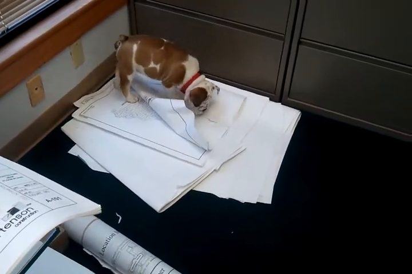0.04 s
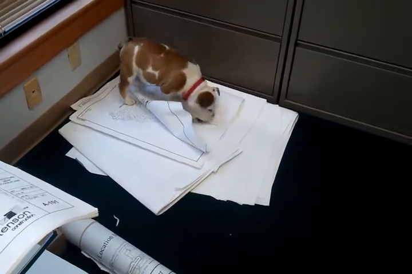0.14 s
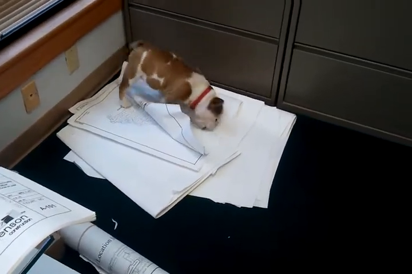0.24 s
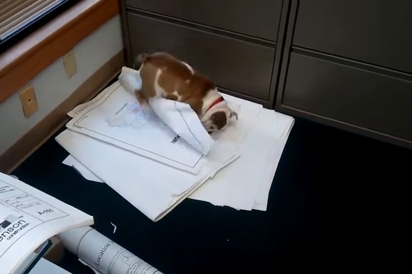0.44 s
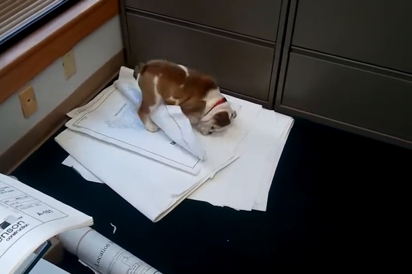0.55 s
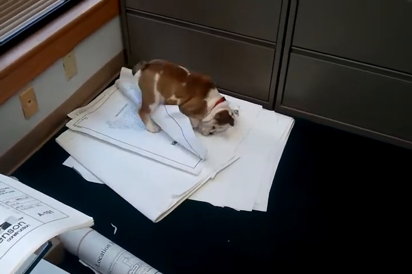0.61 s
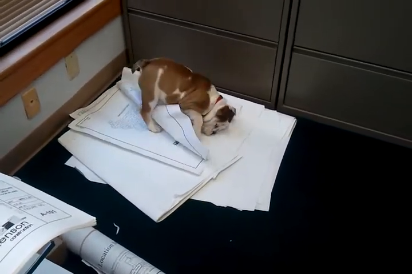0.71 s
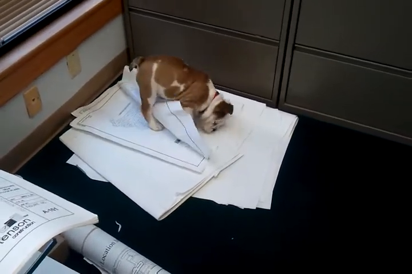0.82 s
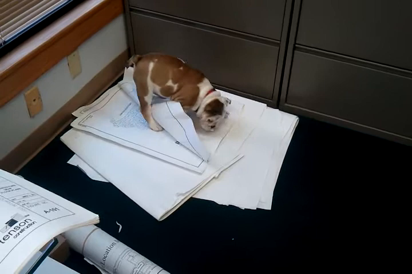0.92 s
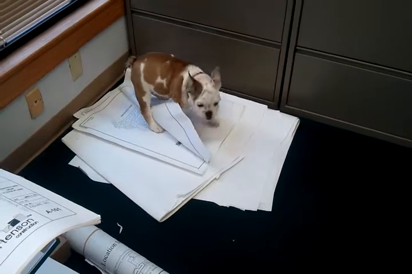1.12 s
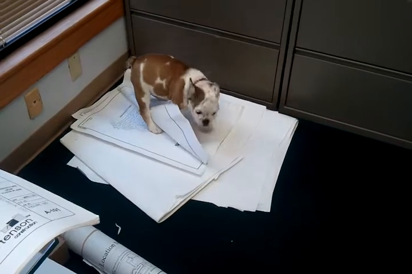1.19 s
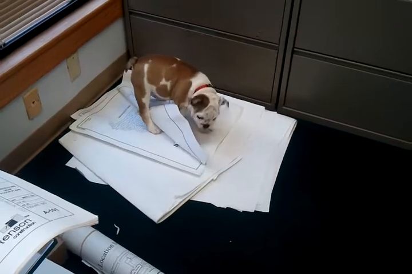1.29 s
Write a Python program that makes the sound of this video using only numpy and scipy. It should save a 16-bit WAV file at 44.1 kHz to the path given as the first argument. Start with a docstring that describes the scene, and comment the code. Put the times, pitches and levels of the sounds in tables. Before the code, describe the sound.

Paper crumples in quick bursts with crisp snaps, then slides with a thin rasp and a few fainter crackles. A puppy's soft steps thud beneath the sheets, and the close walls of a quiet office add a short ring.

```python
"""Puppy on paper sheets

A puppy paws and noses large paper sheets on the carpet of a small office. The sheets slide
over each other with a fine hiss, crumple in short swells and snap where a crease gives way.
Soft paw steps thud underneath; close walls and cabinets add a short ring."""
import sys
import numpy as np
from scipy import signal
from scipy.fft import rfft, irfft, next_fast_len
from scipy.io import wavfile

SR = 44100
rng = np.random.default_rng(int(sys.argv[2]) if len(sys.argv) > 2 else 0)


def put_to_file(sound):
    """Save the sound as 16-bit audio at rate SR, in the file named by the first command-line argument."""
    columns = np.atleast_2d(sound).T  # one column per channel
    safe = np.clip(columns, -1, 1)
    whole_steps = np.round(safe * 32767)
    wavfile.write(sys.argv[1], SR, whole_steps.astype(np.int16))


N = 59535
T = np.arange(N) / SR
CUTOFF_HZ = 8500
FIBRE_TICKS_PER_S, FIBRE_SPREAD_DB = 11000, 3.5


def from_db(db):
    """Decibels to gain."""
    return 10 ** (np.asarray(db) / 20)


def rms_one(x):
    """Scale to unit rms."""
    return x / np.sqrt(np.mean(x ** 2) + 1e-20)


def at_hz(points, hz):
    """Read a table on a log-frequency axis."""
    freqs, values = np.transpose(points)
    return np.interp(np.log(np.maximum(hz, 1)), np.log(freqs), values)


def coloured(x, spectrum):
    """Minimum-phase EQ with a steep top roll-off; keeps the power of white input."""
    size = next_fast_len(2 * N)
    hz = np.arange(size // 2 + 1) * SR / size
    gain = rms_one(from_db(at_hz(spectrum, hz)) / (1 + (hz / (CUTOFF_HZ + 1000)) ** 12))
    # folding the cepstrum keeps the filter from ringing ahead of a click
    cepstrum = irfft(np.log(gain), size)
    cepstrum[1:size // 2] *= 2
    cepstrum[size // 2 + 1:] = 0
    return irfft(rfft(x, size) * np.exp(rfft(cepstrum)), size)[:N]


def resonance(x, hz, q):
    """Band-pass around one pitch, narrower as q rises."""
    edge_ratio = 1 + .5 / max(q, .5)
    band_hz = [hz / edge_ratio, min(hz * edge_ratio, SR / 2 - 1000)]
    return signal.sosfilt(signal.butter(2, band_hz, "band", fs=SR, output="sos"), x + 1e-18)


def grains(per_s, spread_db):
    """Random clicks of uneven size, at unit rms."""
    sizes = from_db(spread_db * np.minimum(rng.exponential(1, N), 4))
    signs = rng.choice([-1, 1], N)
    return rms_one(sizes * signs * (rng.random(N) < per_s / SR))


def swell(peak_s, rise_s, decay_s):
    """Exponential rise to 1 at the peak, then exponential decay."""
    return np.exp(np.maximum(np.minimum((T - peak_s) / rise_s, (peak_s - T) / decay_s), -30))


def burst(start_s, decay_s):
    """Instant attack, then exponential decay."""
    return (T > start_s) * swell(start_s, 1, decay_s)


def shaped(x, envelope):
    """Put x under an envelope, with the energy of that envelope."""
    y = x * envelope
    return y * np.sqrt(np.sum(envelope ** 2) / (np.sum(y ** 2) + 1e-20))


def air():
    """Room tone: the still air of the office, a faint, dark, steady noise."""
    # tone of the air: freq_hz, gain_db
    colour = [(12, -16), (35, 4), (60, -3.5), (90, -4), (150, -4.5), (235, 5), (320, -2), (600, -2.5),
              (1200, -8.5), (3000, -10), (8000, -11)]
    return from_db(-55.5) * rms_one(coloured(rng.standard_normal(N), colour))


def slide():
    """Fibres catch and slip in thousands of tiny ticks that blur into a hiss as the sheets move."""
    # level ride of paper sliding on paper: time_s, level_db
    ride = [(0, -60.5), (.09, -53.5), (.135, -50), (.18, -70), (.222, -53.5), (.29, -37.5), (.325, -32.5),
            (.41, -47.5), (.47, -44), (.505, -44), (.522, -31.5), (.537, -40.5), (.58, -41), (.71, -50.5),
            (.76, -50), (.805, -41), (.84, -45), (.925, -41), (1.03, -43), (1.09, -58), (1.15, -48.5),
            (1.175, -50.5), (1.215, -45), (1.24, -52.5), (1.3, -54.5), (1.35, -53.5)]
    # tone of the hiss: freq_hz, gain_db
    colour = [(30, -48.5), (100, -20.5), (250, -7.5), (700, -7), (1300, -6.5), (2600, -10), (3500, -5.5),
              (4400, -1.5), (6500, 1.5), (7700, 1), (9000, -11.5)]
    level_db = np.interp(T, *np.transpose(ride))
    ticks = grains(FIBRE_TICKS_PER_S, FIBRE_SPREAD_DB)
    return from_db(level_db) * rms_one(coloured(ticks, colour))


def crumples():
    """A swell of small buckles crackles and shakes the bending panel of paper."""
    # a sheet crumples: peak_s, rise_s, decay_s, crackle_db, panel_hz, panel_db
    swells = [(0.139, 0.018, .016, -51, 680, -57), (0.15, 0.0079, 0.0094, -63, 3700, -39.5),
              (0.246, 0.0039, 0.021, -33, 1050, -36), (0.251, 0.0036, 0.025, -41.5, 2500, -36),
              (0.309, 0.0086, 0.02, -43.5, 850, -40.5), (0.33, 0.035, 0.024, -39, 3200, -35),
              (0.353, 0.0093, 0.025, -33, 777, -36), (0.361, 0.011, 0.024, -28, 1194, -37),
              (0.497, 0.0043, 0.014, -32, 780, -37.5), (0.573, 0.015, 0.032, -40.5, 805, -45.5),
              (0.618, 0.0076, 0.016, -50, 600, -36.5), (0.63, 0.0051, 0.019, -29, 1500, -38.5),
              (.657, 0.003, 0.022, -42.5, 2200, -44), (0.781, .004, .01, -71, 1000, -52.5),
              (0.937, 0.003, 0.029, -25.5, 830, -51), (0.957, 0.0034, 0.032, -37, 510, -43.5),
              (1.049, 0.0034, 0.011, -73, 2880, -44.5), (1.169, 0.0057, 0.01, -47, 1100, -54),
              (1.271, 0.0072, 0.006, -49, 1610, -54), (1.313, 0.0015, 0.016, -42, 1170, -74),
              (1.328, 0.0065, 0.0083, -49, 1100, -42.5)]
    # tone of the crackle: freq_hz, gain_db
    colour = [(40, -26.5), (110, -27.5), (220, -1), (450, -5), (800, -1.5), (1400, -4.5), (2200, -4.5),
              (3200, -4.5), (4500, -0.5), (6500, 1.5), (7700, 1.5), (9000, -13.5)]
    crackle, panels = 0, 0
    for peak_s, rise_s, decay_s, crackle_db, panel_hz, panel_db in swells:
        buckles = grains(per_s=6500, spread_db=2.5)
        envelope = swell(peak_s, rise_s, decay_s)
        crackle += from_db(crackle_db) * shaped(buckles, envelope)
        panels += from_db(panel_db) * shaped(resonance(buckles, panel_hz, q=0.98), envelope)
    return coloured(crackle, colour) + panels


def thuds():
    """Each soft landing is a damped low note and a puff of air from under the sheet."""
    # paws and sheets land on the carpet: start_s, level_db, pitch_hz
    landings = [(.135, -41.5, 314), (0.297, -45, 229), (0.349, -39.5, 253), (0.367, -46, 110),
                (0.455, -43, 180), (0.508, -32, 202), (.563, -43, 212), (0.614, -37.5, 201),
                (.943, -46.5, 232), (0.959, -45.5, 195), (1.038, -44, 209), (1.202, -43.5, 190),
                (1.221, -50, 137), (1.323, -42, 208)]
    rise_s, puff_gain = 0.0035, 0.57
    out = 0
    for start_s, level_db, pitch_hz in landings:
        age = np.maximum(T - start_s, 0)
        envelope = (1 - np.exp(-age / rise_s)) * burst(start_s, decay_s=0.011)
        note = np.sin(2 * np.pi * pitch_hz * age) * envelope
        puff = shaped(resonance(rng.standard_normal(N), pitch_hz, q=0.91), envelope)
        out += from_db(level_db) * (note + puff_gain * puff)
    return out


def snaps():
    """A crease gives way with a sharp crack, duller when weak; the freed panel rings briefly."""
    # a crease snaps: start_s, crack_db, panel_hz, ring_db
    creases = [(0.1441, -23.5, 770, -38), (0.1494, -28, 2050, -36), (0.1723, -38, 864, -34.5),
               (0.239, -24.5, 840, -29), (0.2395, -14.5, 4580, -20.5), (0.2421, -20, 6240, -22),
               (0.2453, -17, 1300, -28), (0.2525, -35.5, 2880, -26), (.3472, -35, 874, -21.5),
               (0.3511, -35, 1355, -23), (0.3534, -45.5, 3410, -19), (.3545, -43.5, 690, -24.5),
               (0.359, -37, 1390, -19), (0.4932, -19.5, 840, -28.5), (0.4923, -20, 5000, -23.5),
               (0.5634, -42, 1130, -34.5), (0.6063, -59, 1320, -27.5), (0.613, -24.5, 676, -33),
               (0.6192, -18, 1780, -37), (0.628, -27.5, 4340, -22.5), (0.6346, -20.5, 1750, -29),
               (0.6525, -20, 3570, -25.5), (0.658, -21.5, 1846, -25), (0.81, -40, 7250, -31),
               (.9520, -23.5, 4330, -24.5), (1.1344, -27.5, 3660, -39.5), (1.1354, -51, 1470, -37.5),
               (1.14, -46, 2000, -36.5)]
    # tone of the crack: freq_hz, gain_db
    colour = [(60, -30), (300, -26), (800, -6.5), (2000, -4), (4500, -6), (7500, 2.5), (9000, -6)]
    brightest_hz, dulling_oct_per_db = 13000, 0.37
    sag_per_s, flutter_gain = 15.6, 0.41
    strongest_db = max(row[1] for row in creases)
    cracks, rings = 0, 0
    for start_s, crack_db, panel_hz, ring_db in creases:
        age = np.maximum(T - start_s, 0)
        noise = rng.standard_normal(N)
        # a panel radiates little far below its own pitch
        low_cut = signal.butter(2, 0.38 * panel_hz, "high", fs=SR)
        top_hz = brightest_hz * 2 ** (dulling_oct_per_db * (crack_db - strongest_db))
        high_cut = signal.butter(2, top_hz, fs=SR)
        crack = shaped(noise, burst(start_s, decay_s=0.0017))
        crack = signal.lfilter(*low_cut, crack + 1e-18)
        cracks += from_db(crack_db) * signal.lfilter(*high_cut, crack + 1e-18)

        envelope = burst(start_s, decay_s=0.0025)
        cycles = panel_hz * np.log1p(sag_per_s * age) / sag_per_s  # pitch sinks as the panel relaxes
        flutter = shaped(resonance(noise, panel_hz, q=1.84), envelope)
        ring = np.sin(2 * np.pi * cycles) * envelope + flutter_gain * flutter
        rings += from_db(ring_db) * signal.lfilter(*low_cut, ring + 1e-18)
    return coloured(cracks, colour) + rings


def rasp():
    """The edge of a sheet drags over the one below and rasps around one high pitch."""
    ticks = resonance(grains(FIBRE_TICKS_PER_S, FIBRE_SPREAD_DB), hz=4360, q=9)
    return from_db(-49) * shaped(ticks, swell(peak_s=0.86, rise_s=0.015, decay_s=0.17))


def room(x):
    """Dense reflections off walls and cabinets build up quickly and die away band by band."""
    # ring time of the office: freq_hz, t60_s
    ring_times = [(150, 0.65), (1000, 0.2), (4000, 0.19), (8000, 0.24)]
    predelay_s, build_s = 0.0023, 0.00033
    age = np.maximum(T - predelay_s, 0)
    edges_hz = np.geomspace(60, 12000, 9)
    tail = 0
    for low, high in zip(edges_hz, edges_hz[1:]):
        band_pass = signal.butter(2, [low, high], "band", fs=SR, output="sos")
        band = signal.sosfilt(band_pass, rng.standard_normal(N))
        t60_s = at_hz(ring_times, np.sqrt(low * high))
        envelope = (1 - np.exp(-age / build_s)) * np.exp(-np.log(1000) * age / t60_s)
        tail += band * envelope / np.sqrt(np.sum(envelope ** 2))
    return signal.fftconvolve(x, tail)[:N]


def scene():
    """The layers ring in the office, each with its own reflections; room tone lies under it all."""
    reverb_db = -8
    layers = [slide() + rasp(), crumples(), snaps(), thuds()]
    room_tone = air()
    action = sum(layer + from_db(reverb_db) * room(layer) for layer in layers)
    return (action + room_tone)[None]


def record(dry):
    """The microphone loses the deep bass; the recorder cuts the top steeply."""
    low_cut_hz = 50
    thinned = signal.sosfilt(signal.butter(2, low_cut_hz, "high", fs=SR, output="sos"), dry)
    high_cut = signal.firwin(101, CUTOFF_HZ, window=("kaiser", 6.5), fs=SR)
    return signal.fftconvolve(thinned, high_cut[None], mode="same")


dry = scene()
out = record(dry)
put_to_file(out)
```